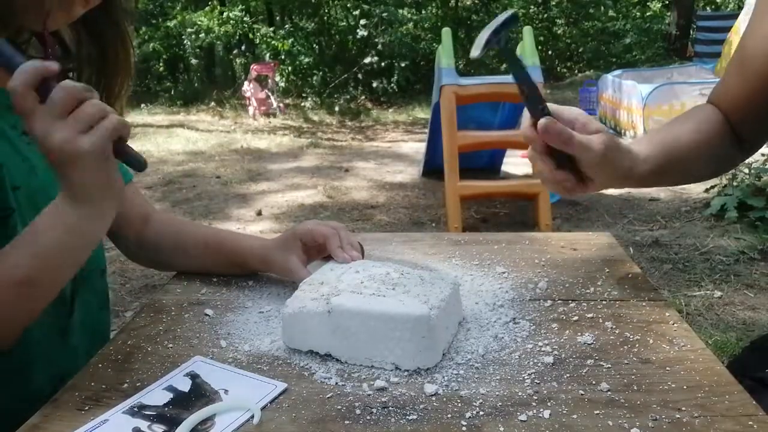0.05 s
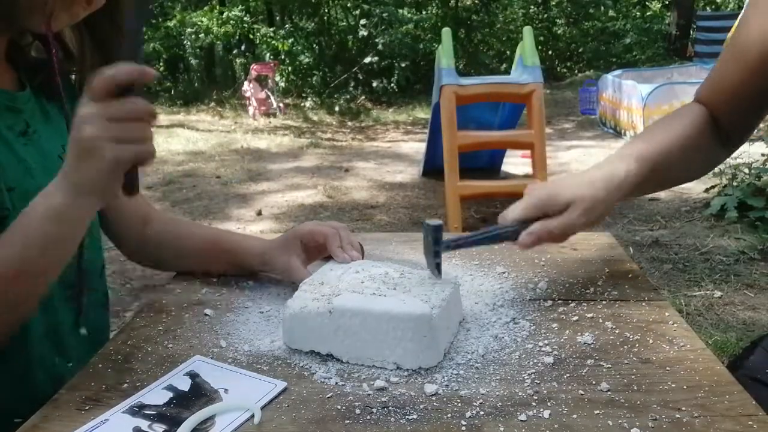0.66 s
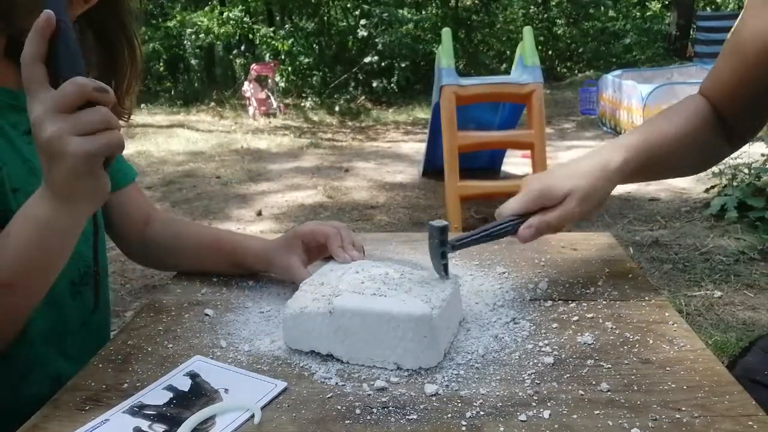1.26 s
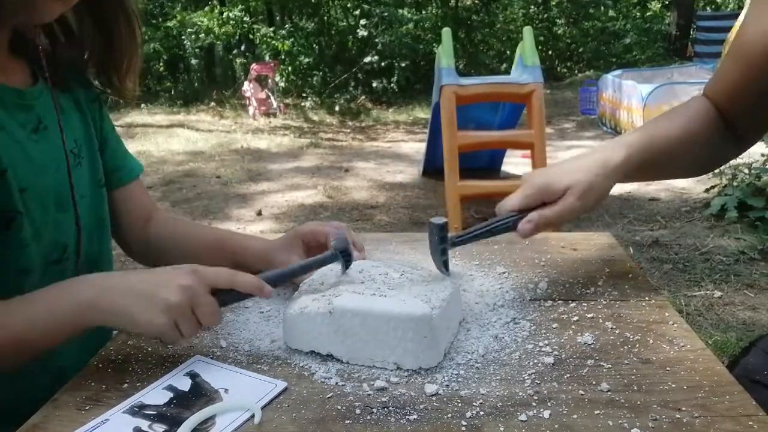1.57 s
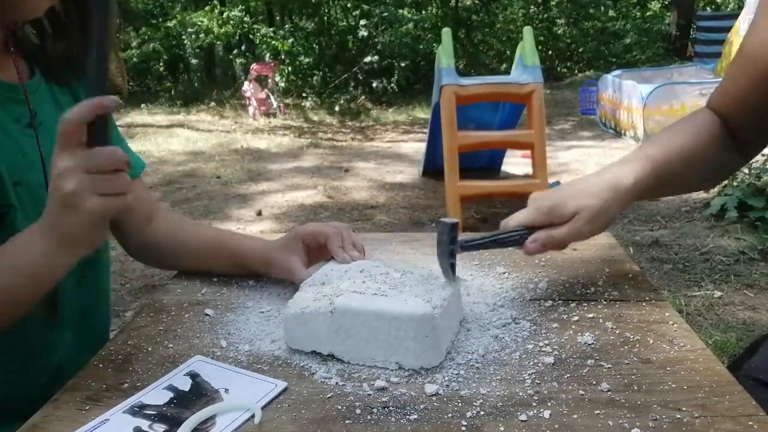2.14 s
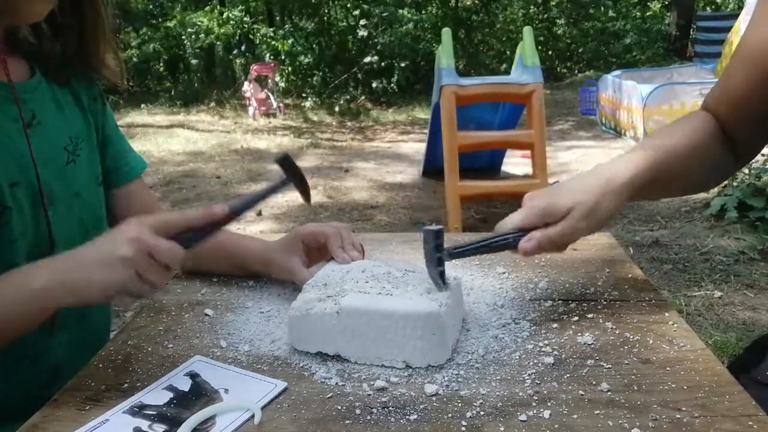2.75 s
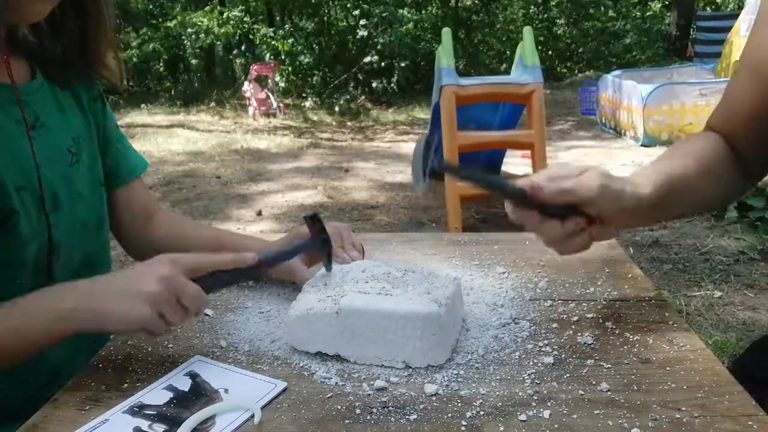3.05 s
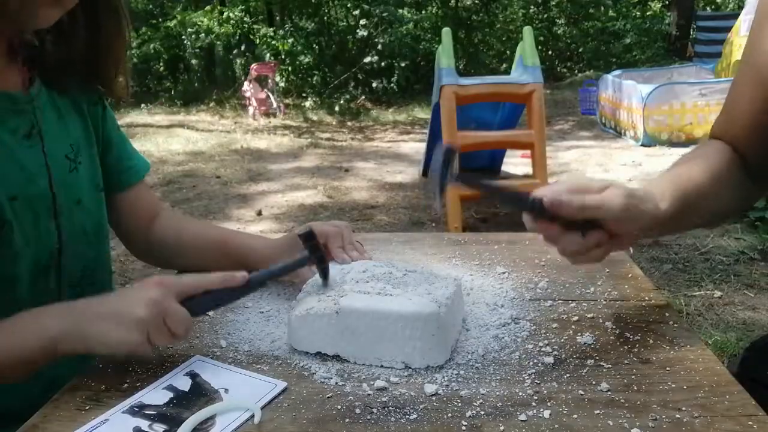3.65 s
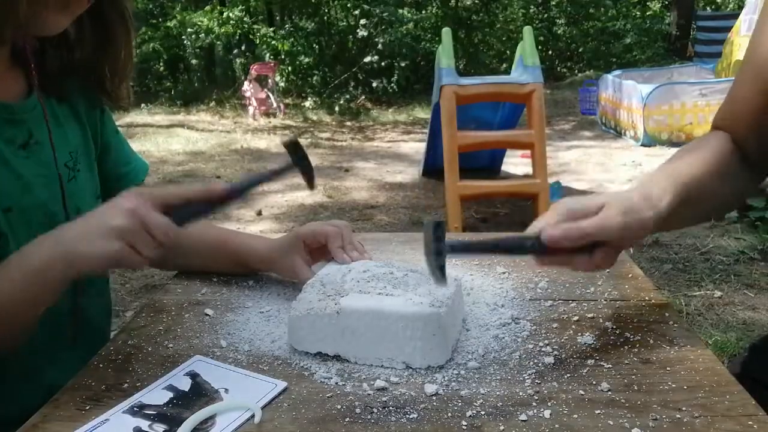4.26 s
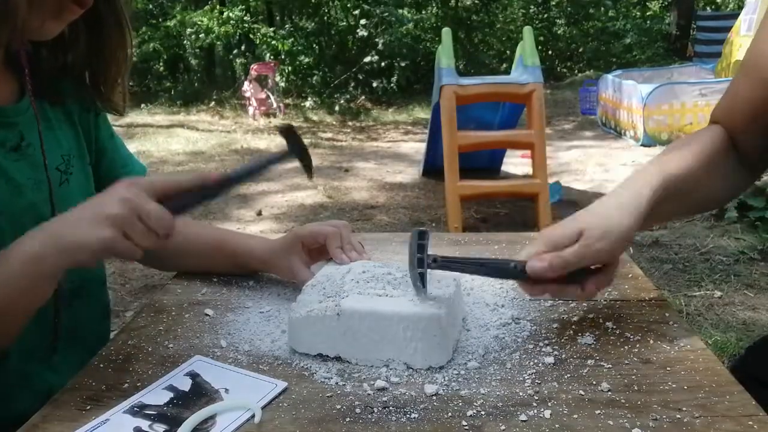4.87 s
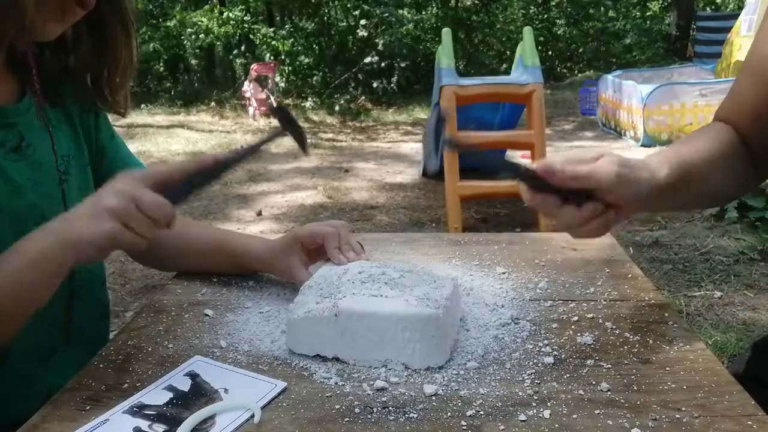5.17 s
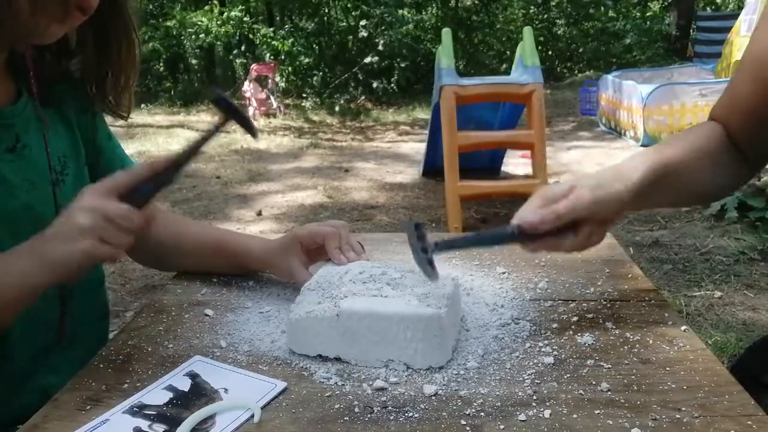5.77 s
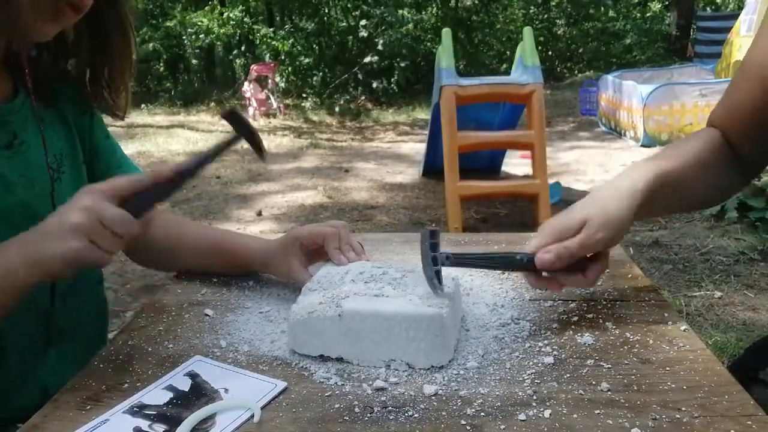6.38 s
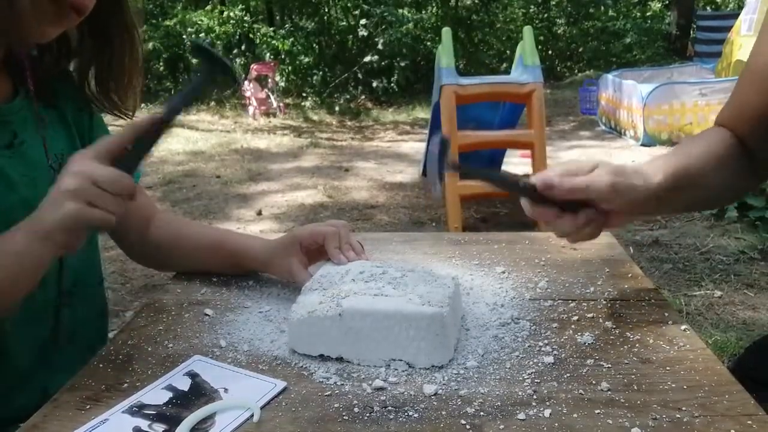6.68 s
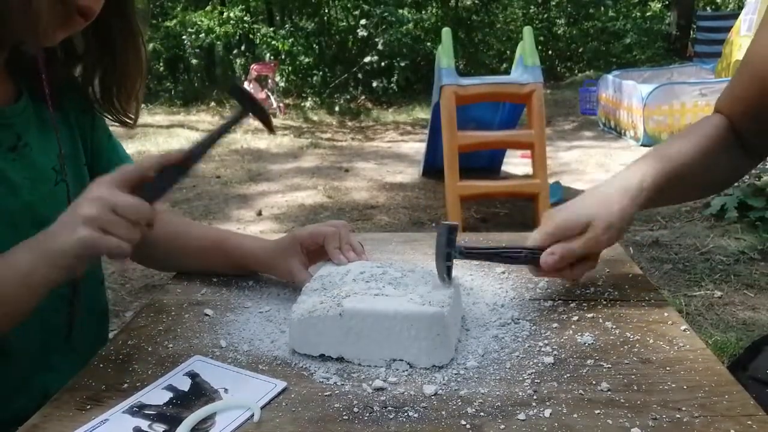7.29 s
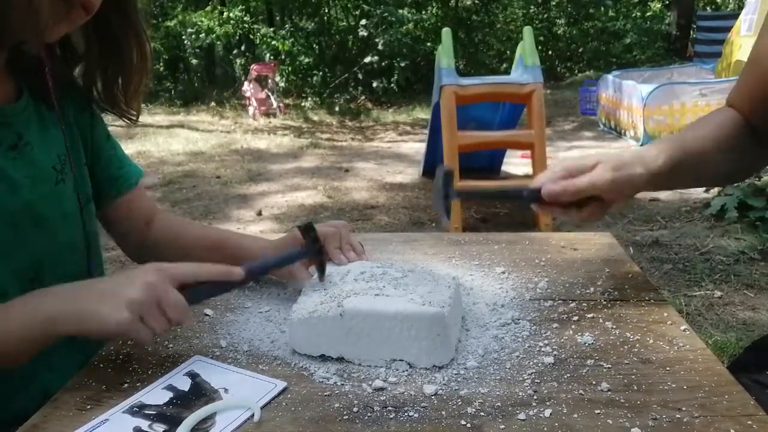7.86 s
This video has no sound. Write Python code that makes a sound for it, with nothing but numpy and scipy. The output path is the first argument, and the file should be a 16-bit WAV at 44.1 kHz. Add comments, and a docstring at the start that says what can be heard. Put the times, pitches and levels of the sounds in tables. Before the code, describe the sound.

Two small steel hammers chip at a plaster block on a wooden garden table, close to the microphone. From the start they strike in a quick, uneven patter, often in near pairs. Each blow combines a dry knock, a low table thud, a small gritty crunch and a faint ring of steel. From about 1 to 3 seconds the blows are sparser, and one hammer's pick drags over the block in around seven short, rasping scrapes that make the table rumble softly. From 3 seconds until the end at about 8 seconds, both hammers tap busily, roughly eight blows a second. A very faint, high steel shimmer lingers near 4.1 and 5.6 seconds. Crumbs patter on the boards throughout, with larger chips ticking down around 4.6 to 5.4 seconds and again at 7. The garden returns a slight echo, and a light breeze stirs the microphone.

```python
"""Two small steel hammers chip at a plaster block on a wooden garden table, close to the microphone.
Each blow thuds the table, knocks the block, rings the steel and crushes a little plaster; crumbs and
chips scatter after it, and twice the steel shimmers on. Early on, one hammer's pick is dragged over
the block in short scrapes. Farther off the garden answers faintly; a light breeze stirs the microphone."""
import sys
import numpy as np
from scipy import signal
from scipy.fft import rfft, irfft, next_fast_len
from scipy.io import wavfile
from scipy.ndimage import map_coordinates

SR = 44100
rng = np.random.default_rng(int(sys.argv[2]) if len(sys.argv) > 2 else 0)


def int16_out(signal):
    """Quantize to a 16-bit WAV file."""
    q = np.round(np.clip(np.atleast_2d(signal).T, -1, 1) * 32767)
    wavfile.write(sys.argv[1], SR, q.astype(np.int16))


N = 353889
EVENT_N = SR // 3
EVENT_T = np.arange(EVENT_N) / SR  # seconds since a contact


def amp(db):
    """Decibels to gain."""
    return 10 ** (np.asarray(db) / 20)


def unit(x):
    """Scale to rms 1."""
    return x / np.sqrt(np.mean(x ** 2) + 1e-20)


def burst(x, blow_s=.02):
    """Scale a short sound to the energy of rms 1 over one blow."""
    return unit(x) * np.sqrt(blow_s * SR / x.shape[-1])


def along(points, hz):
    """Read (freq_hz, value) points on a log frequency axis."""
    freqs, values = np.transpose(points)
    return np.interp(np.log(hz + 1), np.log(freqs), values)


def coloured(x, points, share=1):
    """Causal filter through (freq_hz, gain_db) points; share scales the decibels."""
    n = x.shape[-1]
    m = 2 * next_fast_len(n // 2 + 2048)
    gain = amp(share * along(points, np.fft.rfftfreq(m, 1 / SR)))
    cepstrum = irfft(np.log(gain))
    cepstrum[1:m // 2] *= 2  # fold to minimum phase
    cepstrum[m // 2 + 1:] = 0
    return irfft(rfft(x, m) * np.exp(rfft(cepstrum)), m)[..., :n]


def pair(n, alike):
    """Left and right noise sharing the fraction `alike` of their power."""
    noise = rng.standard_normal((3, n))
    return np.sqrt(alike) * noise[2] + np.sqrt(1 - alike) * noise[:2]


def ticks(per_s, spread_db):
    """Impulses of uneven size at random times throughout the scene."""
    return (rng.random(N) < per_s / SR) * amp(spread_db * rng.standard_normal(N).clip(-2, 2))


def add(track, start_s, sound):
    """Mix a sound in at start_s."""
    part = track[:, max(round(start_s * SR), 0):][:, :sound.shape[-1]]
    part += sound[:, :part.shape[-1]]


def ring(modes, scatter_db, detune, apart_db):
    """Damped modes: strength and pitch vary with the spot struck, strength also between left and right."""
    hz, db, t60 = np.transpose(modes)
    tuning, strength, side = rng.standard_normal((3, len(hz)))
    pitch_hz = hz * (1 + detune * tuning)
    waves = np.cos(2 * np.pi * pitch_hz[:, None] * EVENT_T) * amp(-60 * EVENT_T / t60[:, None])
    return -amp(db + scatter_db * strength + apart_db * np.array([side, -side])) @ waves


def pushed(x, contact_s, low_hz):
    """A contact of finite length dulls a body's ring; its slowest motion hardly radiates."""
    t = EVENT_T[:256]
    force = t * np.exp(-t / contact_s)
    motion = signal.fftconvolve(x, force[None])[:, :EVENT_N]
    return signal.sosfilt(signal.butter(2, low_hz, "high", fs=SR, output="sos"), motion)


def crushing(crush_s, rattle_db, rattle_t60):
    """Force on the plaster: it builds, collapses and leaves a weak rattle."""
    u = EVENT_T / (crush_s / 2)
    rattle = amp(rattle_db - 60 * EVENT_T / rattle_t60) * (1 - np.exp(-u))
    return u * np.exp(1 - u) + rattle


# Still air all round the garden: freq_hz, gain_db
AIR_SPECTRUM = [(40, -8), (110, -7), (250, -26), (600, -19.5), (1500, -27.5), (3000, -33.5), (4000, -42.5),
                (6000, -31.5), (10000, -46), (15000, -45.5)]

def still_air():
    """Open air is a faint, steady, mostly low noise."""
    return amp(-68) * unit(coloured(pair(N, alike=.6), AIR_SPECTRUM))


# Wind right on the microphone: freq_hz, gain_db
WIND_SPECTRUM = [(20, -13), (50, -3.5), (85, -6.5), (160, -20.5), (500, -50.5), (2000, -92)]
# The level of its lulls: time_s, level_db
WIND_LULLS = [(0.0, -80), (2.39, -68.5), (2.57, -76.5), (3.06, -73.5), (5.23, -80), (5.47, -73.5),
              (7.91, -81), (8.02, -78.5)]

def breeze(above_lulls_db=13.5, gust_db=2.5, gusts_per_s=3.2):
    """Light gusts buffet the two microphone ports, each partly on its own."""
    buffet = unit(coloured(pair(N, alike=.4), WIND_SPECTRUM))
    t = np.arange(N) / SR
    gusts = map_coordinates(rng.standard_normal(int(t[-1] * gusts_per_s) + 4), [t * gusts_per_s])
    lull_db = np.interp(t, *np.transpose(WIND_LULLS))
    return amp(lull_db + above_lulls_db + gust_db * gusts) * buffet


# The garden's echo, heard from the table: freq_hz, gain_db
ECHO_SPECTRUM = [(150, -8), (500, 3.5), (1400, -5.5), (3000, -4), (4000, -8), (6000, -9), (10000, -2),
                 (15000, -3.5)]
# How long it lingers: freq_hz, t60_s
ECHO_DECAY = [(200, 0.51), (1000, 0.27), (3000, 0.81), (6000, 0.74), (14000, 0.12)]

def garden_echo(x, build_s=.05):
    """Ground, toys and trees scatter a tail that differs from moment to moment."""
    out, step = np.zeros((2, N)), SR // 4
    for i in range(0, N, step):
        hz, t, noise = signal.stft(rng.standard_normal((2, SR * 2 // 3)), SR, nperseg=256)
        fade = amp(-60 * t / along(ECHO_DECAY, hz)[:, None]) * (1 - np.exp(-t / build_s))
        tail = unit(signal.istft(noise * fade, SR, nperseg=256)[1])
        tail /= np.sqrt(tail.shape[1])
        add(out, i / SR, signal.fftconvolve(x[:, i:i + step], tail, axes=1))
    return coloured(out, ECHO_SPECTRUM)


# Treble at close range, leaning to the left port when positive: freq_hz, lean_db
PORT_LEAN = [(2500, -0.5), (4400, 0.5), (5600, 2), (7500, -6.5), (10000, -7), (13000, -1.5)]

def ports(x):
    """Each microphone port favours different parts of the treble."""
    return np.array([coloured(x[0], PORT_LEAN, .96), coloured(x[1], PORT_LEAN, -.91)])


def left_late(x, lag_s):
    """A source right of centre reaches the left port later."""
    m = next_fast_len(N + 4096)
    phase = np.pi * lag_s * np.fft.rfftfreq(m, 1 / SR) * np.array([[-1], [1]])
    return irfft(rfft(x, m) * np.exp(1j * phase), m)[:, :N]


# Steel ringing that lingers after two of the blows: start_s, level_db
STEEL_SHIMMERS = [(4.141, -68.5), (5.64, -73.5)]

def steel_shimmer(swell_s=.13, impulses_per_s=900):
    """A faint 5-7 kHz shimmer of steel ringing swells and fades."""
    impulses = (rng.random(N) < impulses_per_s / SR) * pair(N, alike=.3)
    shimmer = signal.sosfilt(signal.butter(2, [5100, 7200], "band", fs=SR, output="sos"), impulses)
    envelope = np.zeros((1, N))
    u = np.arange(SR)[None] / SR / swell_s
    for start_s, level_db in STEEL_SHIMMERS:
        add(envelope, start_s, amp(level_db) * u * np.exp(1 - u))
    return envelope * unit(shimmer)


# Crumbs dropping on the boards near the microphone: freq_hz, gain_db
PATTER_SPECTRUM = [(300, -11.5), (1000, -10), (1800, 3.5), (2600, 5.5), (4000, -8.5), (6000, -5),
                   (15000, -21)]

def patter():
    """Stray crumbs land a few times a second, each a tiny puff of noise."""
    landings = signal.fftconvolve(ticks(per_s=4, spread_db=2), np.exp(-EVENT_T / .0024))[:N]
    return coloured(amp(-56) * landings * pair(N, alike=.6), PATTER_SPECTRUM)


# Loose plaster grit, close up: freq_hz, gain_db
GRIT_SPECTRUM = [(300, -15), (600, 6.5), (1400, -2.5), (2300, -4.5), (3000, -4), (4000, -8.5), (5000, 0),
                 (5750, 6), (6500, -8), (7400, -4.5), (10000, -15.5), (15000, -17.5), (16500, -32)]

def grit(force, alike):
    """Dry plaster rasps with a noise that follows the force on it."""
    return ports(coloured(force * pair(len(force), alike), GRIT_SPECTRUM))


# Larger chips landing nearby: start_s, relative_db
CHIP_LANDINGS = [(0.362, -46), (0.3934, -49.5), (4.619, -32.5), (4.9391, -43.5), (5.2421, -36.5),
                 (5.383, -40.5), (6.4032, -46), (7.0314, -39)]

def chips():
    """Each chip lands with one dry tick."""
    out = np.zeros((2, N))
    impact = crushing(.0012, rattle_db=-16, rattle_t60=.03)
    for start_s, relative_db in CHIP_LANDINGS:
        add(out, start_s, amp(relative_db - 13.5) * burst(grit(impact, alike=.3)))
    return out


# Modes of the wooden table top with the block on it: pitch_hz, level_db, t60_s
TABLE_MODES = [(172.4, -10, 0.17), (207.1, -6.5, 0.089), (234.9, 0, 0.091), (256.8, -3.5, 0.13),
               (331, -12.5, 0.15), (350.2, -6.5, 0.1), (401, -9, 0.11)]

def table_rumble(drive):
    """A dragging force keeps the table's low modes ringing."""
    boards = ring(TABLE_MODES, scatter_db=0, detune=0, apart_db=.7)
    response = unit(pushed(boards, contact_s=.0014, low_hz=178)) / np.sqrt(EVENT_N)
    return signal.fftconvolve(drive, response, axes=1)[:, :N]


def table_thud(over_knock_db):
    """A blow sets the table swinging; a cushioned one, with little knock, takes longer to do so."""
    boards = ring(TABLE_MODES, scatter_db=1.8, detune=.012, apart_db=1)
    swell_s = min(.00051 * amp(over_knock_db) ** 2, .006)
    swing = boards * (1 - np.exp(-EVENT_T / swell_s))
    return burst(pushed(swing, contact_s=.00021, low_hz=175))


def stroke(length_s, bite_s=.0043, arch_db=18, lift_db_per_s=418):
    """Pressure of one drag: the pick bites at once, presses hardest midway, then lifts off."""
    arch = np.sin(np.pi * np.minimum(EVENT_T / length_s, 1))
    lifted_s = np.maximum(EVENT_T - length_s, 0)
    return (1 - np.exp(-EVENT_T / bite_s)) * amp(arch_db * (arch - 1) - lift_db_per_s * lifted_s)


# The pick dragged over the block, close up: start_s, length_s, grit_db, rumble_db
PICK_STROKES = [(1.026, 0.072, -50.5, -45.5), (1.288, 0.12, -42, -37), (1.573, 0.15, -43, -37),
                (1.894, 0.15, -42.5, -41.5), (2.217, 0.11, -36, -35.5), (2.515, 0.12, -35, -37.5),
                (2.816, 0.072, -37, -40)]

def scrapes(bite_db=-15, steady_drag=.4):
    """The pick catches and slips; each slip breaks off grit, and the table rumbles while it bites."""
    pressure, bite = np.zeros((2, 1, N))
    for start_s, length_s, grit_db, rumble_db in PICK_STROKES:
        push = stroke(length_s)[None]
        add(pressure, start_s, amp(grit_db) * push)
        add(bite, start_s, amp(rumble_db) * push ** 2 / (push ** 2 + amp(bite_db) ** 2))
    slips = ticks(per_s=280, spread_db=5)
    force = steady_drag + signal.fftconvolve(slips, np.exp(-EVENT_T / .002))[:N]
    rasp = pressure * unit(grit(force, alike=.72))
    return rasp + table_rumble(bite * unit(force * rng.standard_normal(N)))


# The plaster block and the boards under it: pitch_hz, level_db, t60_s
BLOCK_MODES = [(556, -3, 0.085), (601, 7, 0.038), (646, 0.5, 0.053), (724.5, 1, 0.095), (902, -3, 0.058),
               (968, -3, 0.035)]
# The boards' many close modes and the rubble shaking on them: freq_hz, gain_db
RUBBLE_SPECTRUM = [(80, -38.5), (170, 5), (330, 4.5), (700, 0.5), (1100, -4), (1700, -15.5), (2400, -17.5),
                   (3200, -17), (4200, -27.5), (6000, -28.5), (15000, -49)]

def block_knock():
    """The struck block rings briefly, a little to the right, and shakes the rubble around it."""
    block = ring(BLOCK_MODES, scatter_db=2.5, detune=.012, apart_db=3)
    knock = burst(pushed(block, contact_s=.00024, low_hz=365)) * amp([[-1.2], [1.2]])
    shaking = amp(-60 * EVENT_T / .1) * (1 - np.exp(-EVENT_T / .006))
    rubble = burst(coloured(pair(EVENT_N, alike=.81) * shaking, RUBBLE_SPECTRUM))
    return knock + amp(-6.5) * rubble


# Steel meeting plaster, alike in both ports: freq_hz, gain_db
CLACK_SPECTRUM = [(300, -11), (800, -5.5), (1150, -6), (1500, -1.5), (2000, -8.5), (2400, -7.5),
                  (3000, -26), (4000, -21.5), (16000, -34)]

def contact_clack(crush_s):
    """The contact itself is a very short, hard burst of noise."""
    force = crushing(.56 * crush_s, rattle_db=-13.5, rattle_t60=.045)
    return burst(coloured(pair(EVENT_N, alike=1) * force, CLACK_SPECTRUM))


# The hammers' steel shafts: pitch_hz, level_db, t60_s
SHAFT_MODES = [(997, -30, .55), (2140, -23, .16), (2360, -24, .06), (2960, -34, .4)]

def shaft_ring():
    """The lightly damped shaft rings on faintly after the blow."""
    return ring(SHAFT_MODES, scatter_db=4, detune=.002, apart_db=2)


# Plaster breaking close to the microphone: freq_hz, gain_db
CRUNCH_SPECTRUM = [(1000, -24), (2500, -23), (3300, -6), (4000, -20.5), (4700, -2.5), (5300, 6), (5900, 5),
                   (6700, 3.5), (7400, -9), (8300, -4), (10500, -13.5), (15000, -12), (16500, -28)]
# The hammer head, damped by the plaster it bites into: pitch_hz, level_db, t60_s
HEAD_MODES = [(2700, 0.5, 0.023), (2940, 1, .02), (3075, 8, 0.012), (3300, -10, 0.02)]
# The hammer's thin pick end: pitch_hz, level_db, t60_s
PICK_MODES = [(4750, -12.5, 0.031), (5455, -9, 0.039), (5740, 5.5, 0.0071), (7160, -5, 0.022)]

def plaster_crunch(side_db, crush_s):
    """Cracking plaster sounds itself, sets the steel head and pick ringing and throws crumbs."""
    head = ring(HEAD_MODES, scatter_db=3, detune=.016, apart_db=2)
    pick = ring(PICK_MODES, scatter_db=4, detune=.025, apart_db=2)
    grains = pair(EVENT_N, alike=.28) * crushing(1.114 * crush_s, rattle_db=-35, rattle_t60=.23)
    clink = burst(signal.fftconvolve(grains, head, axes=1)[:, :EVENT_N])
    ping = -burst(signal.fftconvolve(grains, pick, axes=1)[:, :EVENT_N])
    crack = burst(coloured(grains, CRUNCH_SPECTRUM))
    crunch = burst(ports(crack + ping)) * amp([[side_db / 2], [-side_db / 2]])
    return amp(-13) * (crunch + amp(-9) * crumb_spray()) + amp(-18.5) * clink


def crumb_spray(per_s=300, settle_s=.03, spread_db=4):
    """Flying crumbs tick just after the blow, thinning out as they settle."""
    chance = per_s / SR * np.exp(-EVENT_T / settle_s) * (EVENT_T > .008)
    hits = rng.random(EVENT_N) < chance
    sizes = amp(spread_db * rng.standard_normal((2, EVENT_N)).clip(-2, 2))
    return ports(coloured(hits * sizes, CRUNCH_SPECTRUM))


# Both hammers at close range; levels are relative, positive side_db moves the crunch left:
# start_s, crunch_db, thud_db, knock_db, side_db, crush_s
HAMMER_BLOWS = [(0.0143, -12.5, -29.5, -28.5, 5, 0.0017), (0.0425, -28, -29.5, -32, -4.5, 0.0029),
                (0.2756, -26, -27.5, -25.5, -1.5, 0.0027), (0.3041, -22, -29, -25.5, 5, 0.0018),
                (0.5157, -23.5, -26.5, -28, 7, 0.0029), (0.623, -22, -26, -30, 14.5, 0.0027),
                (0.6507, -20.5, -42.5, -29, 11, 0.0024), (0.7566, -25.5, -24, -23.5, 12.5, 0.0019),
                (0.996, -19.5, -34, -31.5, -1.5, 0.0021), (1.0016, -25.5, -34.5, -34, 7.5, 0.0026),
                (1.285, -32.5, -40.5, -41.5, 2, 0.0026), (1.5791, -39.5, -42, -47, 8, 0.0013),
                (1.6845, -19, -28, -25, 7, 0.0016), (1.8903, -48.5, -44.5, -66.5, 7.5, 0.0012),
                (2.055, -24.5, -28, -25, 0.5, 0.0019), (2.2103, -30.5, -37.5, -30.5, 5, 0.0011),
                (2.4246, -21, -25.5, -26, 2, 0.0019), (2.504, -48.5, -44, -43, 1.5, 0.0019),
                (2.795, -19.5, -26.5, -25.5, 4, 0.0026), (3.1048, -21, -40.5, -29, -7, 0.0014),
                (3.1537, -18.5, -26.5, -26.5, 2.5, 0.0017), (3.3147, -20.5, -29, -32, -0.5, 0.0024),
                (3.4797, -18, -27.5, -25, 1, 0.0021), (3.5118, -20.5, -31, -32.5, 2.5, 0.0019),
                (3.714, -19, -28.5, -31.5, 7.5, 0.0017), (3.7717, -24.5, -31, -34, 4, 0.001),
                (3.924, -19, -26.5, -28.5, 3, 0.0019), (4.0368, -20, -25, -26.5, 3, 0.0017),
                (4.0602, -34, -43, -41, 3.5, 0.0021), (4.1406, -17, -30, -29, 10, 0.0021),
                (4.3009, -18, -26.5, -25, 9, 0.0021), (4.355, -18.5, -33.5, -35, 9, 0.0023),
                (4.567, -20, -33.5, -30.5, 2.5, 0.0025), (4.5914, -24, -31, -31, 5.5, 0.0012),
                (4.7795, -24, -29.5, -31, 8.5, 0.0018), (4.8872, -22.5, -28.5, -30, 5, 0.0026),
                (4.9889, -24.5, -32, -36.5, 6, 0.0019), (5.1674, -20.5, -28, -26, 8.5, 0.0011),
                (5.2115, -22, -27, -32.5, 12.5, 0.0019), (5.4284, -25.5, -24.5, -31.5, 10.5, 0.001),
                (5.5024, -27, -26, -25.5, 14.5, 0.0019), (5.64, -23, -25, -27.5, 14.5, 0.0016),
                (5.8008, -27.5, -26.5, -26.5, 18, 0.00098), (5.8505, -20.5, -28, -28.5, 14, 0.0013),
                (6.0486, -27.5, -27.5, -30.5, 3, 0.0019), (6.0669, -25.5, -35.5, -33, 3.5, 0.0025),
                (6.097, -29.5, -59.5, -28, 5, 0.0029), (6.2854, -24.5, -32, -35.5, 4.5, 0.0024),
                (6.368, -27.5, -28.5, -29.5, 0, 0.0019), (6.5008, -21, -29, -31.5, -0.5, 0.0019),
                (6.6716, -23, -27, -27, 2.5, 0.0016), (6.7224, -23, -29.5, -32.5, 1.5, 0.0019),
                (6.9415, -30.5, -28, -35, -8.5, 0.0023), (6.9804, -29, -29.5, -30, -2, 0.0023),
                (7.1786, -22.5, -31, -30.5, 3, 0.0019), (7.2937, -26.5, -28.5, -30, 6.5, 0.0021),
                (7.4247, -26.5, -30, -31, 2.5, 0.0015), (7.6192, -19, -29.5, -25.5, 9, 0.0015),
                (7.67, -21, -30.5, -29.5, 2.5, 0.0019), (7.9073, -33, -27.5, -26, 11.5, 0.0022),
                (7.971, -29, -30.5, -29, 15, 0.0019)]

def hammers():
    """Each blow thuds the table, knocks steel against the block and crushes a little plaster."""
    out = np.zeros((2, N))
    for start_s, crunch_db, thud_db, knock_db, side_db, crush_s in HAMMER_BLOWS:
        add(out, start_s, amp(thud_db) * table_thud(thud_db - knock_db))
        knock = amp(-5.5) * block_knock() + amp(-6) * contact_clack(crush_s) + amp(-7) * shaft_ring()
        add(out, start_s, amp(knock_db) * knock)
        add(out, start_s, amp(crunch_db) * plaster_crunch(side_db, crush_s))
    return out


def scene():
    """The work on the table, close and just right of centre, with the garden faint behind it."""
    work = left_late(hammers() + patter() + chips() + scrapes() + steel_shimmer(), lag_s=.0001)
    return work + amp(-31.5) * garden_echo(work) + still_air() + breeze()


def record(dry, top_hz=16600):
    """The microphone sheds the deep bass of the blows and keeps nothing above its band limit."""
    thinned = coloured(dry, [(30, -6.0), (95, -15), (135, -2), (300, -1.5)])  # freq_hz, gain_db
    m = next_fast_len(N + SR // 2)
    in_band = np.fft.rfftfreq(m, 1 / SR) < top_hz
    return irfft(rfft(thinned, m) * in_band, m)[:, :N]


dry = scene()
out = record(dry)
int16_out(out)
```